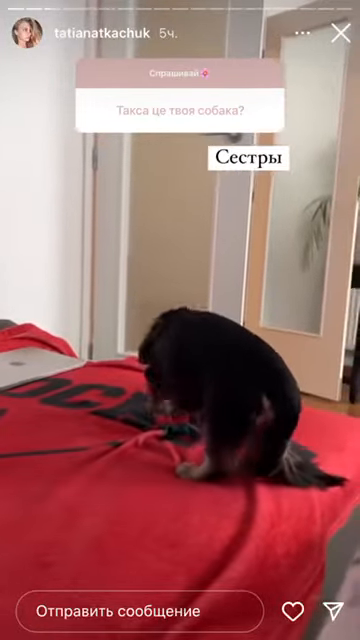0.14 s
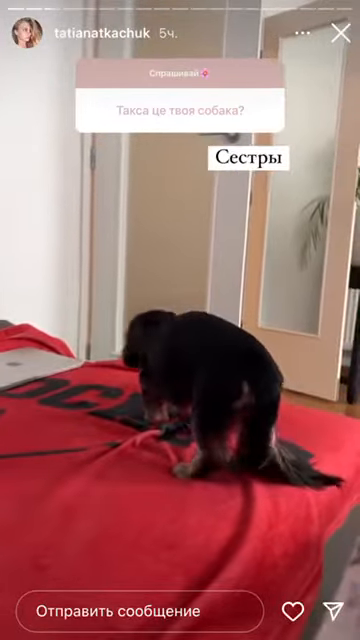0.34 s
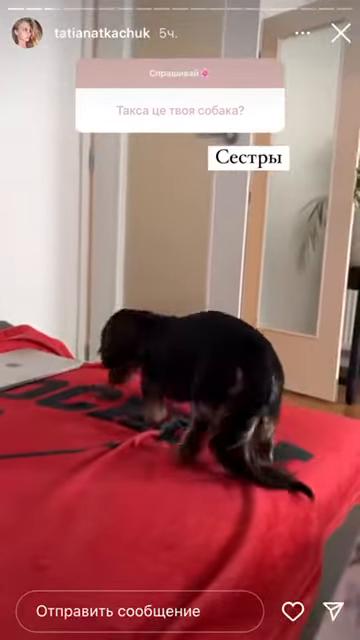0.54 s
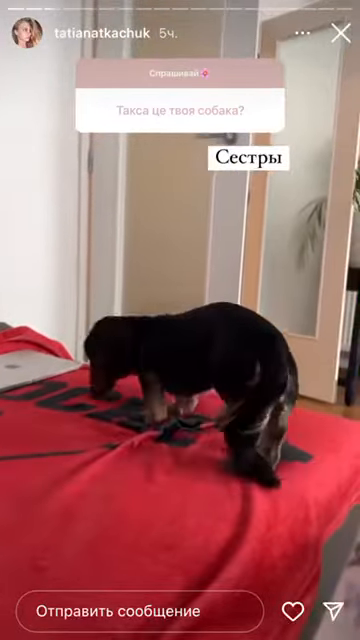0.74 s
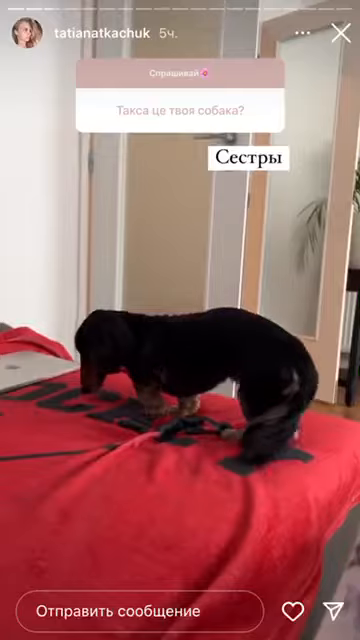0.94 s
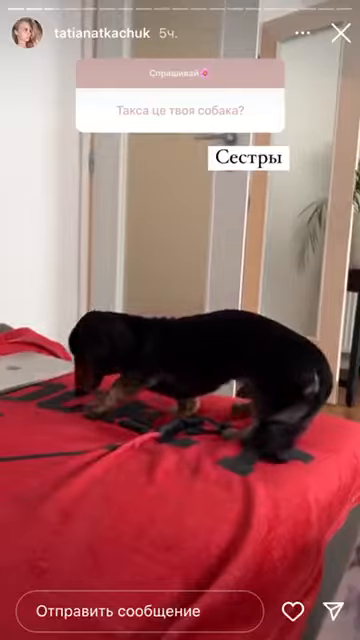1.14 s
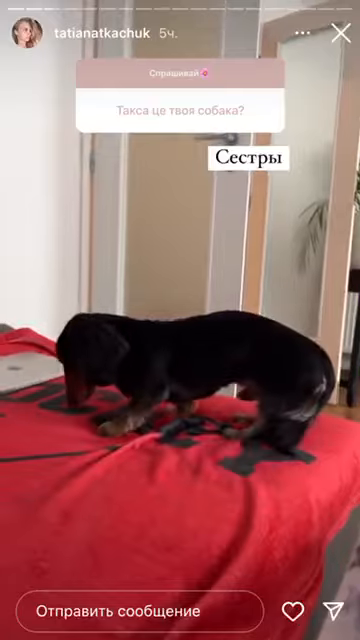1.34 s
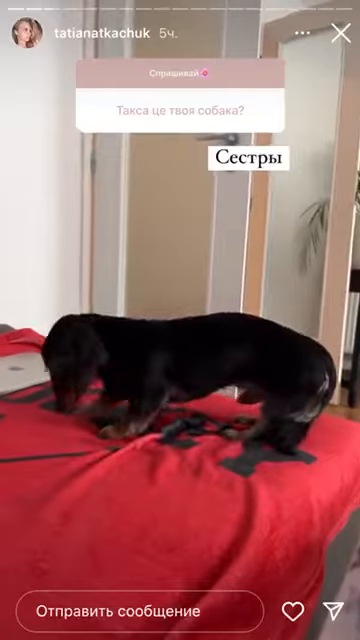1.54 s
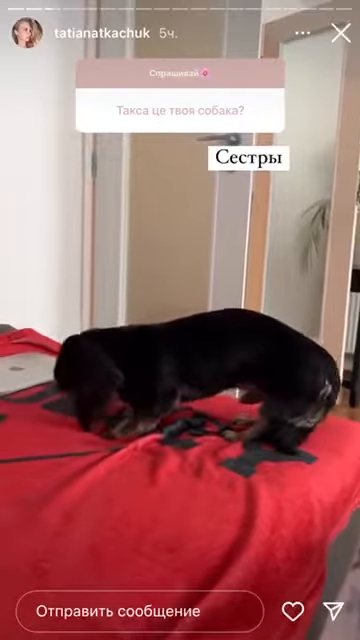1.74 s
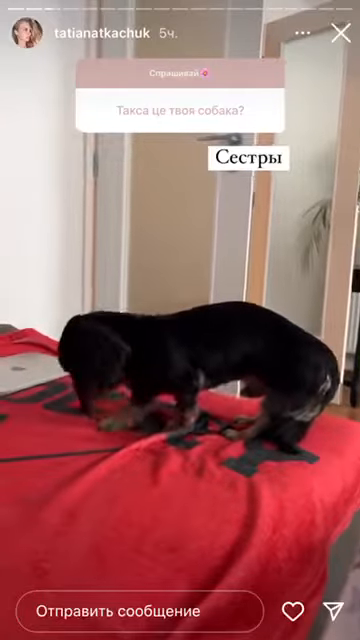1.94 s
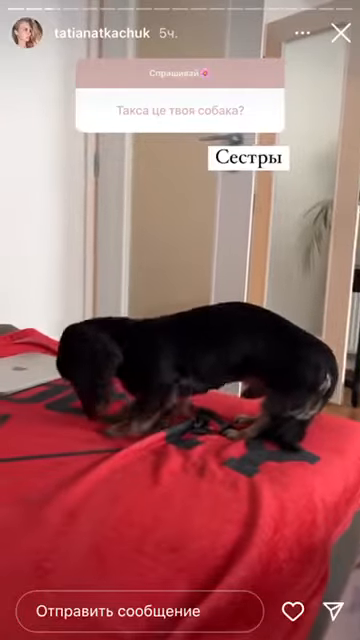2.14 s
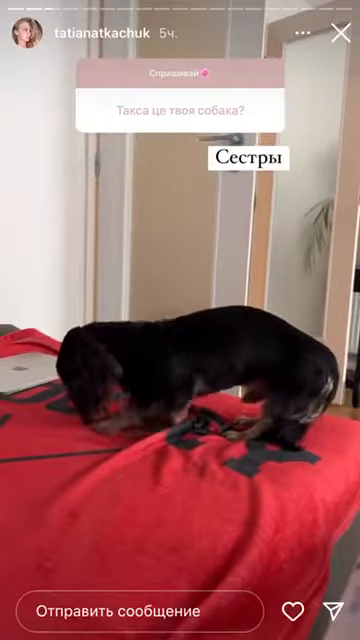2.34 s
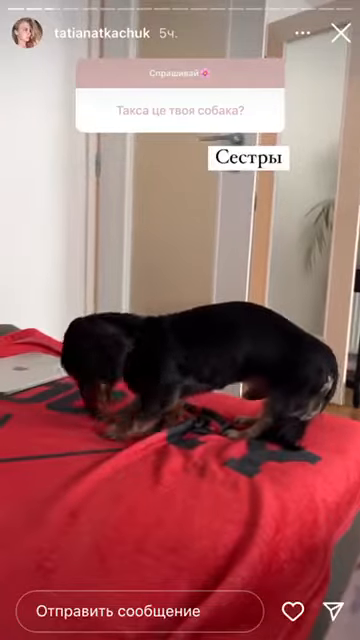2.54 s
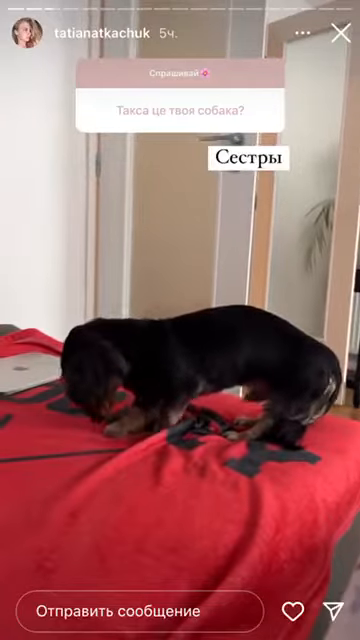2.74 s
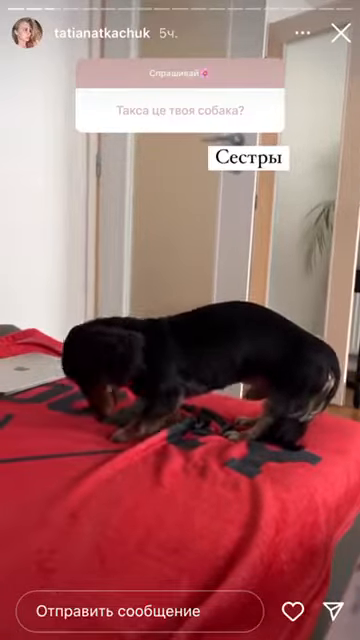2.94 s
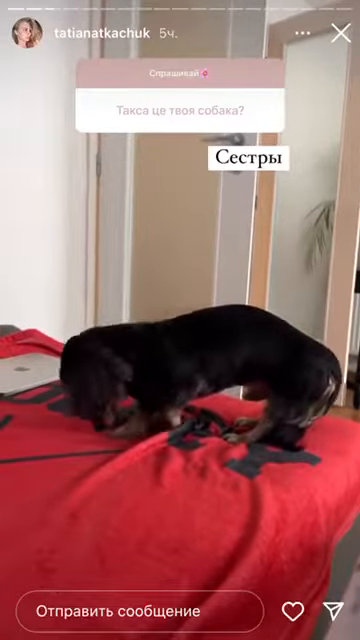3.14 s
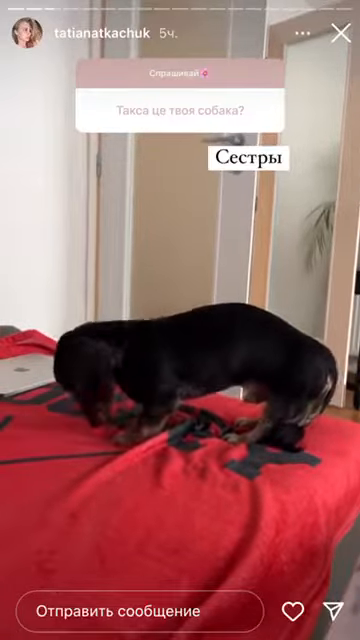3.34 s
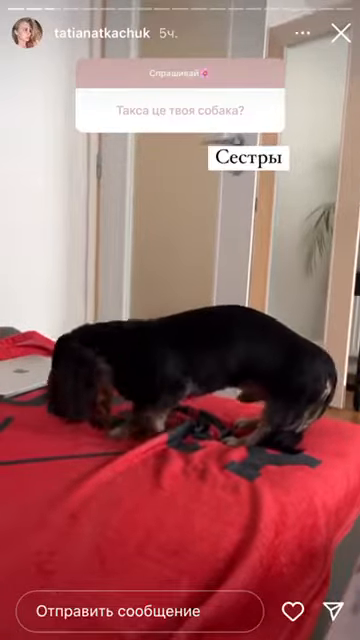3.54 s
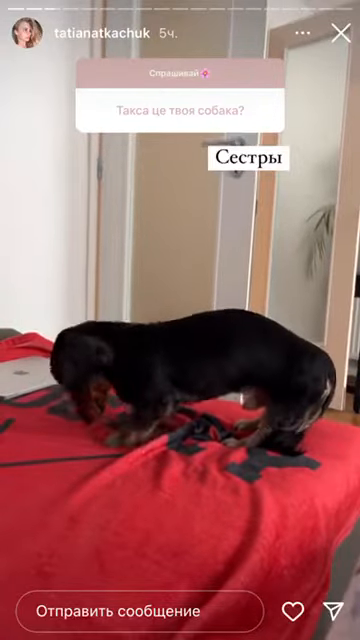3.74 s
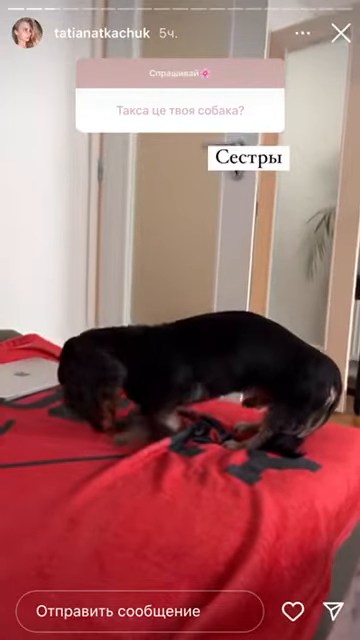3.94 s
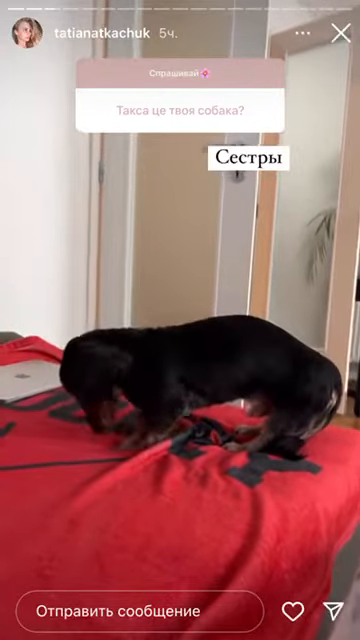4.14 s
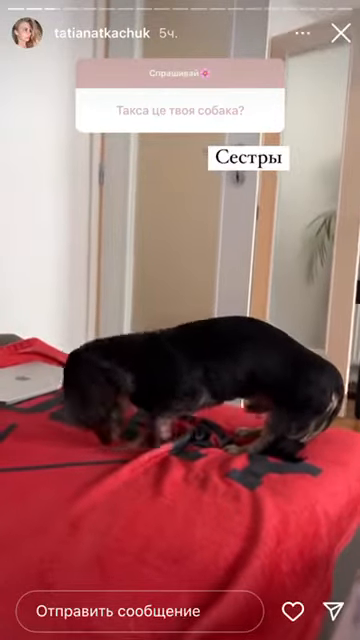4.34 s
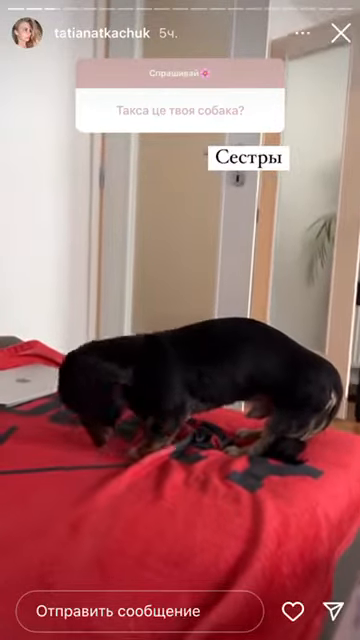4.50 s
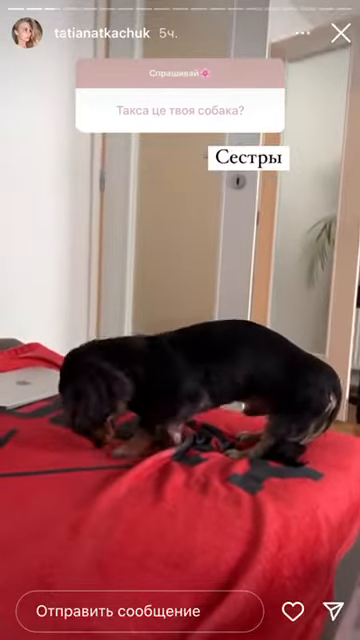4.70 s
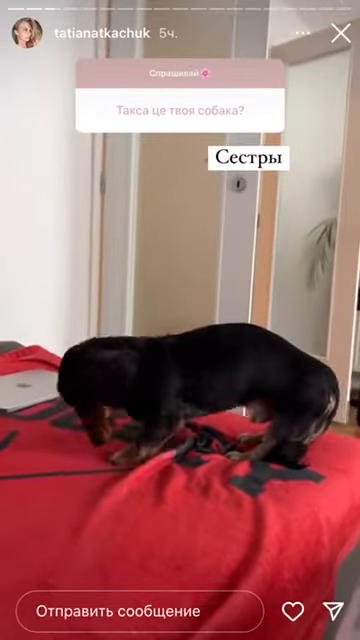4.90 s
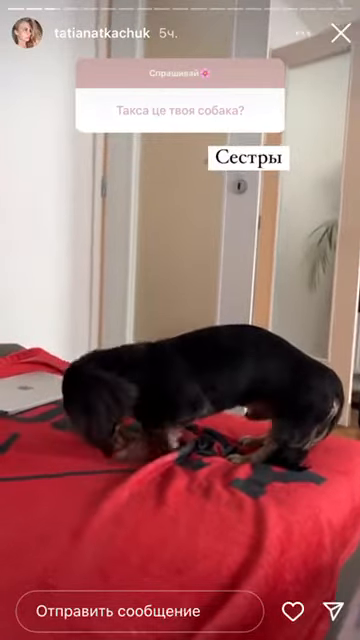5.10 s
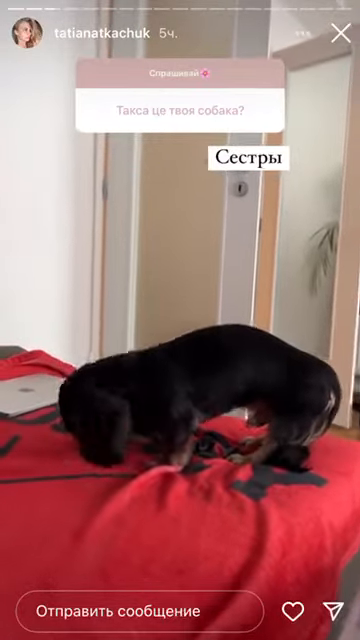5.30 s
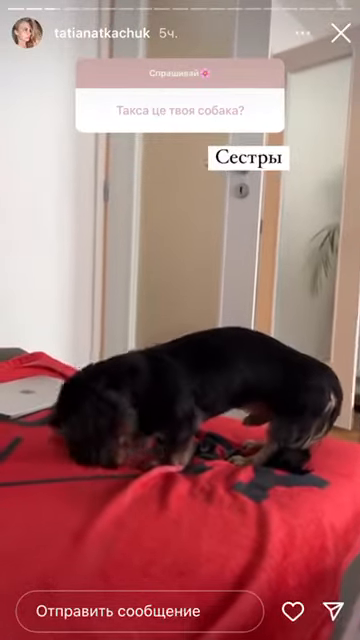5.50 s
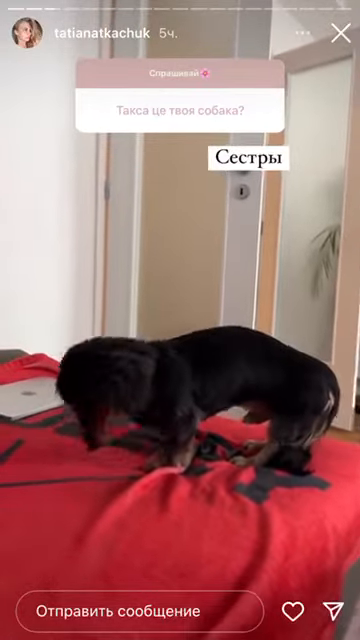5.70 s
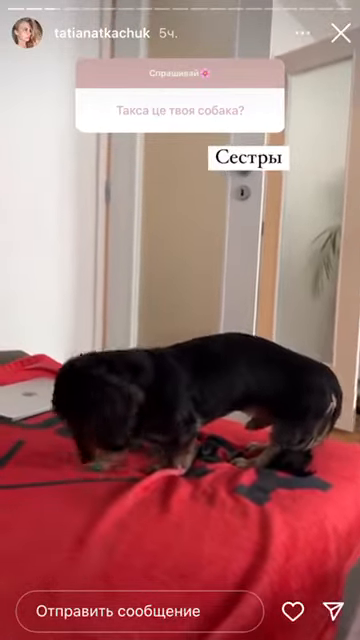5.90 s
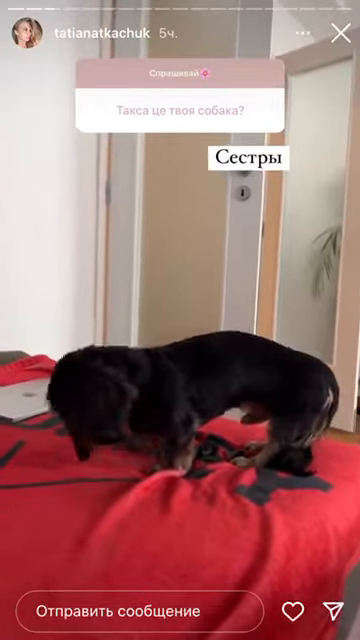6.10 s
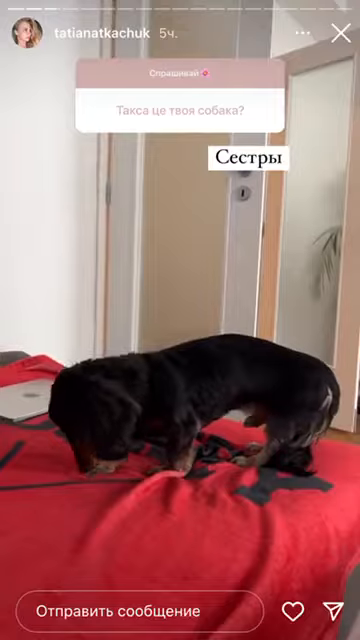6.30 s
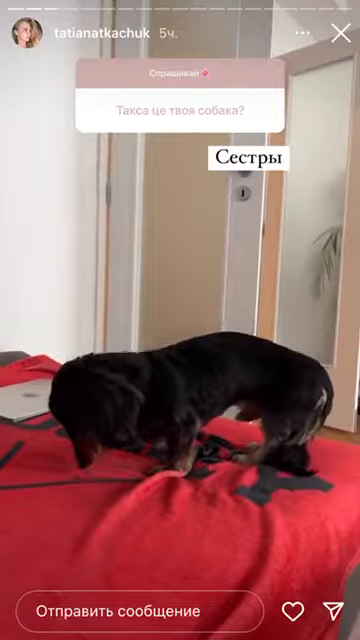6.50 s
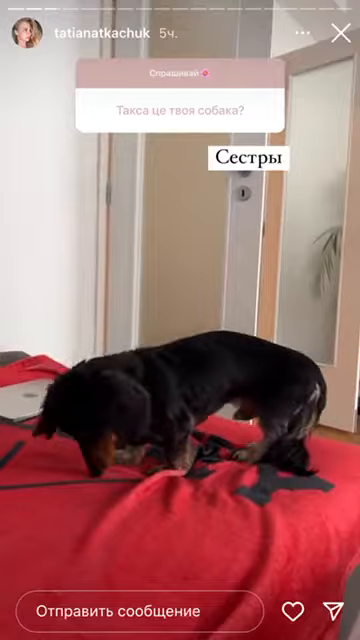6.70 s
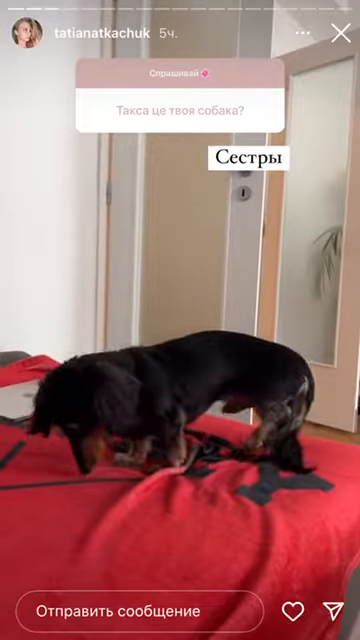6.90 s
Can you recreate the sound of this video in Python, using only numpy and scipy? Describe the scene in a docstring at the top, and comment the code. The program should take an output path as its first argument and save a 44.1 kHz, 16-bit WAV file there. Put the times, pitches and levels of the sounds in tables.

```python
"""A small bedroom, the microphone close to a small dog on a bed with a fleece blanket.
Over faint room tone the dog shuffles round, with soft steps, one hollow pop and a low hum that comes and goes.
From 1.5 s it rakes with its two front paws in turn: claws hiss over the nap, catch and slip in the weave
as it pulls taut, and each tug thuds into the mattress. After 5 s come three single strokes,
then a few more steps as it settles."""
import sys
import numpy as np
from scipy import signal
from scipy.fft import rfft, irfft, next_fast_len
from scipy.io import wavfile
from scipy.ndimage import uniform_filter1d, map_coordinates

SR = 44100
rng = np.random.default_rng(int(sys.argv[2]) if len(sys.argv) > 2 else 0)


def persist_wave(psi):
    """Save psi, clipped to +-1, as 16-bit WAV."""
    counts = np.round(np.clip(psi, -1, 1) * 32767).astype(np.int16)
    wavfile.write(sys.argv[1], SR, np.atleast_2d(counts).T)


N = 310989
TIME_S = np.arange(N) / SR


def from_db(db):
    """Decibels to gain."""
    return 10 ** (np.asarray(db) / 20)


def rms_one(x):
    """Scale to rms 1."""
    return x / np.sqrt(np.mean(x ** 2) + 1e-20)


def colour(x, spectrum):
    """Minimum-phase filter through (freq_hz, gain_db) points, falling steeply beyond their ends."""
    size = next_fast_len(N + SR // 2, real=True)
    size += size % 2
    octave = np.log2(np.maximum(np.fft.rfftfreq(size, 1 / SR), 1))
    hz, db = np.transpose(spectrum)
    beyond = np.abs(octave - np.clip(octave, np.log2(hz[0]), np.log2(hz[-1])))
    gain_db = np.interp(octave, np.log2(hz), db) - 24 * np.minimum(beyond, 2)
    cepstrum = irfft(np.log(from_db(gain_db)))
    cepstrum[1:size // 2] *= 2
    cepstrum[size // 2 + 1:] = 0
    return irfft(rfft(x, size) * np.exp(rfft(cepstrum)))[:N]


def even(x, span_s):
    """Hold the slow level at rms 1 and keep the fast grain."""
    size = max(int(span_s * SR), 8)
    power = uniform_filter1d(uniform_filter1d(x ** 2, size), size)
    return x / np.sqrt(np.abs(power) + 1e-12)


def drift(per_s):
    """A smooth random curve through per_s values a second, with a spread near 1."""
    knots, at = rng.standard_normal(8000), np.arange(0, N + 16, 16)
    curve = map_coordinates(knots, [at * per_s / SR], order=3, mode="wrap")
    return np.interp(np.arange(N), at, curve)


def swell(t, start, length):
    """A smooth rise and fall of height 1."""
    return np.sin(np.pi * np.clip((t - start) / length, 0, 1))


def swell_level(middles, lengths, levels_db):
    """The joint level of several swells, added in power."""
    t = TIME_S[::32]
    power = sum((from_db(db) * swell(t, middle - length / 2, length)) ** 2
                for middle, length, db in np.broadcast(middles, lengths, levels_db))
    return np.interp(TIME_S, t, np.sqrt(power))


def ring(hits, hz, t60_s):
    """Each hit (start_s, level_db) sets a decaying sine ringing."""
    clicks = np.zeros(N)
    for start, db in hits:
        clicks[round(start * SR)] = from_db(db)
    r, w = from_db(-60 / (t60_s * SR)), 2 * np.pi * hz / SR
    return signal.lfilter([0, np.sin(w)], [1, -2 * r * np.cos(w), r * r], clicks + 1e-18)


def slips(per_s, spread_db):
    """Random catches and releases of threads, of uneven size and either sign."""
    size = from_db(spread_db * np.minimum(rng.exponential(1, N), 4))
    return (rng.random(N) < per_s / SR) * size * rng.choice([-1, 1], N)


def shifting_folds(x, depth_db, per_s):
    """The folds change shape, so each third of an octave swells and fades on its own."""
    spectrum, hz = rfft(x, 2 ** 19), np.fft.rfftfreq(2 ** 19, 1 / SR)
    band = np.clip(3 * np.log2(np.maximum(hz, 1) / 250), 0, 17)
    thirds = (irfft(spectrum * np.maximum(1 - np.abs(band - k), 0))[:N] for k in range(18))
    return sum(third * from_db(depth_db * drift(per_s)) for third in thirds)


# The quiet bedroom's spectrum: freq_hz, gain_db
ROOM_TONE_SPECTRUM = [(90, -7.5), (150, 2.5), (217, -1.5), (300, -5.5), (420, -21), (520, -25), (650, -24),
                      (1100, -26.5), (1700, -29.5), (2300, -23.5), (2700, -24), (3600, -30), (6500, -30.5),
                      (15500, -39)]
def room_tone(level_db=-37.57):
    """Faint, steady, mostly low noise behind everything."""
    return from_db(level_db) * rms_one(colour(rng.standard_normal(N), ROOM_TONE_SPECTRUM))


# Resonances of the bed and its corner of the room: pitch_hz, width_hz, gain_db
BED_MODES = [(163, 12, 4.5), (336.4, 4.9, -5.5), (406, 84, 3.5), (546, 87, 1), (608, 32, 5),
             (734, 3.5, 6.5), (790, 84, 4), (1080, 30, 6)]
def bed(x):
    """The bed puts a few fixed peaks and one dip into whatever shakes it."""
    for hz, width_hz, db in BED_MODES:
        x = x + (from_db(db) - 1) * signal.lfilter(*signal.iirpeak(hz, hz / width_hz, fs=SR), x)
    return x


# The dog shifts its feet before and after digging: middle_s, length_s, rustle_db, pressure_db, heave_db
SHUFFLES = [(0.044, 0.24, -46, -30.5, -47), (0.148, 0.081, -41.5, -30, -37), (0.267, 0.45, -39, -47, -41),
            (0.467, 0.2, -44.0, -36.0, -32), (0.602, 0.058, -37, -25.5, -30), (0.676, 0.23, -34, -35, -22),
            (1.015, 0.11, -36.5, -27, -27), (1.111, 0.2, -36, -33.5, -47), (1.265, 0.16, -42, -48, -25),
            (6.366, 0.1, -38, -62.5, -28.5), (6.48, 0.31, -45, -33, -28), (6.618, 0.14, -47, -37, -44),
            (6.735, 0.096, -55, -33, -39.0), (6.844, 0.26, -45, -41, -23.5), (7.04, 0.11, -52, -38, -35.0)]
# Spectra of rustling fleece and of the mattress padding: freq_hz, gain_db
RUSTLE_SPECTRUM = [(250, -25.5), (420, 3), (540, 3.5), (680, 2.5), (1100, -2.5), (2100, -8.5),
                   (2700, -15.5), (3700, -11.5), (5000, -21), (8000, -17.5), (14000, -33)]
PADDING_SPECTRUM = [(90, -11.5), (140, -4.5), (190, -0.5), (240, -2.5), (300, -8), (400, -17), (600, -44.5)]
def shuffling(rest_rustle_db=-42, rest_pressure_db=-45):
    """Fur and paws brush the blanket and press into the padding; the dog is never quite still."""
    middle, length, rustle_db, pressure_db, _ = np.transpose(SHUFFLES)
    rustle = np.hypot(swell_level(middle, length, rustle_db), from_db(rest_rustle_db))
    pressure = np.hypot(swell_level(middle, length, pressure_db), from_db(rest_pressure_db))
    cloth = colour(slips(2500, spread_db=2.0), RUSTLE_SPECTRUM)
    cloth = even(shifting_folds(cloth, depth_db=3.0, per_s=16), span_s=0.097)
    padding = even(bed(colour(rng.standard_normal(N), PADDING_SPECTRUM)), span_s=0.026)
    return from_db(-3.5 + drift(28)) * rustle * cloth + from_db(-4.5) * pressure * padding


# The deep rumble of the mattress, heard from close by: freq_hz, gain_db
HEAVE_SPECTRUM = [(15, -43), (25, -3), (36, -1), (47, -3.5), (63, 3), (85, -4.5), (112, -3.5), (140, -14),
                  (250, -35)]
def mattress_heave(rest_db=-30.5):
    """The mattress heaves under every shuffle and stroke and settles slowly."""
    middle, length, _, _, heave_db = np.transpose(SHUFFLES)
    shuffles = swell_level(middle, length, heave_db)
    strokes = stroke_level([row[-1] for row in STROKES], lag_s=0.024, release_s=0.22, ease_db=0)
    level = np.sqrt(strokes ** 2 + shuffles ** 2 + from_db(rest_db) ** 2)
    return from_db(1.07) * level * even(colour(rng.standard_normal(N), HEAVE_SPECTRUM), span_s=0.043)


# Soft steps on the bed: start_s, level_db
STEPS = [(0.137, -25), (1.384, -21.5), (6.5, -26), (6.606, -22), (6.715, -15.5), (6.881, -20.5)]
def paw_steps():
    """Each step rings two low, quickly damped tones."""
    return from_db(-5.5) * (ring(STEPS, hz=190, t60_s=0.094) + ring(STEPS, hz=230, t60_s=0.072))


# The clicks within one pop: start_s, level_db
POP_CLICKS = [(0.3709, -16), (0.3724, -13.5), (0.3743, -8), (0.3776, -40), (0.3842, -18.5)]
# The resonances they excite: pitch_hz, level_db, t60_s
POP_MODES = [(636, -4, 0.033), (840, -2, 0.019), (970, -12, 0.034), (1095, -38, 0.036), (1540, -38, .02),
             (1710, -26, 0.057), (2180, -30, 0.059)]
def hollow_pop(lowpass_hz=2500):
    """A tight cluster of clicks rings briefly and is heard as one hollow pop."""
    pop = sum(from_db(db) * ring(POP_CLICKS, hz, t60_s) for hz, db, t60_s in POP_MODES)
    return signal.sosfilt(signal.butter(4, lowpass_hz, fs=SR, output="sos"), pop)


# A faint low hum that comes and goes: start_s, length_s, pitch_hz, fundamental_db, octave_db
HUMS = [(0.61, 0.16, 205.8, -33, -32.5), (5.457, 0.22, 205.3, -31, -36.5), (6.24, 0.31, 215.3, -27.5, -47),
        (6.967, 0.19, 205, -32, -36)]
def hum(waver=0.013):
    """A soft tone and its octave swell and fade, slightly unsteady in pitch."""
    phase_per_hz = 2 * np.pi * np.cumsum(1 + waver * drift(25)) / SR
    out = np.zeros(N)
    for start, length, hz, db, octave_db in HUMS:
        phase = hz * phase_per_hz
        tone = from_db(db) * np.sin(phase) + from_db(octave_db) * np.sin(2 * phase)
        out += swell(TIME_S, start, length) * tone
    return out


# A paw jerks the blanket or lands with the dog's weight on it: middle_s, thud_db, bounce_db
THUMPS = [(0.668, -41, -21), (1.55, -7, -30), (1.64, -21, -18), (1.698, -14, -26), (1.869, -7.5, -24.5),
          (1.974, -19.5, -7), (2.142, -5, -15), (2.355, -17, -9.5), (2.52, -9, -15), (2.661, -9, -30),
          (2.74, -20, -17), (3.261, -14.5, -14), (3.421, -25, -11), (4.03, -6, -14), (4.418, -17.5, -6.5),
          (4.588, -9.5, -16), (4.743, -19, -11.5), (4.815, -14.5, -14.5), (5.019, -25, -13),
          (5.39, -15, -25)]
THUMP_S = 0.042
def mattress_bounce(pitch_hz=66.5):
    """The mattress gives once under each thump."""
    out = np.zeros(N)
    for middle, _, db in THUMPS:
        level = from_db(db + 3.0) * swell(TIME_S, middle - THUMP_S / 2, THUMP_S) ** 2
        out += level * np.cos(2 * np.pi * pitch_hz * (TIME_S - middle))
    return out


def mattress_thuds(catches, tug):
    """Thumps and tugs carry the claws' catches into the padding as dull thuds."""
    middle, thud_db, _ = np.transpose(THUMPS)
    level = np.hypot(tug, swell_level(middle, THUMP_S, thud_db))
    return from_db(0.05) * level * even(bed(colour(catches, PADDING_SPECTRUM)), span_s=0.063)


# A paw lands and brushes dryly forward over the cloth: middle_s, length_s, level_db
BRUSHES = [(1.481, 0.1, -36), (2.056, 0.066, -31), (2.832, 0.096, -29), (3.232, 0.12, -28.5),
           (3.58, 0.089, -31.5), (3.985, 0.14, -26), (4.364, .08, -25.5), (4.49, 0.14, -31),
           (4.726, 0.07, -23), (5.32, 0.1, -28), (5.71, 0.071, -38), (6.052, 0.11, -33.5)]
# Its spectrum: freq_hz, gain_db
BRUSH_SPECTRUM = [(800, -35), (1100, 1), (1450, 12.5), (1900, 11.5), (2200, 11.5), (2400, -1), (2750, -27),
                  (5000, -32)]
def paw_brushes():
    """Light contact: dense small slips with no weight behind them."""
    level = sum(from_db(db) * swell(TIME_S, middle - length / 2, length)
                for middle, length, db in BRUSHES)
    return level * even(colour(slips(4000, spread_db=1.0), BRUSH_SPECTRUM), span_s=0.061)


def treble_ripple(x, span_s, gain, count=16, changes_per_s=4):
    """A fine, shifting comb ripple colours the hiss, changing a few times a second."""
    out, step = np.zeros(N + SR), SR // changes_per_s
    for middle in range(0, N + step, step):
        taps = np.zeros(int((span_s + .002) * SR) + 2)
        taps[-1 - (rng.random(count) * span_s * SR).astype(int)] = gain * rng.choice([-1, 1], count)
        taps[0] = 1
        part = slice(max(middle - step, 0), middle + step)
        crossfade = swell(TIME_S[part], (middle - step) / SR, 2 * step / SR)
        combed = signal.fftconvolve(x[part] * crossfade, taps)
        out[part.start:part.start + len(combed)] += combed
    return out[:N]


# The nap at close range, its hiss and its topmost sizzle: freq_hz, gain_db
HISS_SPECTRUM = [(1500, 8), (2600, -0.5), (3000, -0.5), (3600, -2.5), (4400, 0), (5100, -3), (5700, -2),
                 (6500, -2.5), (7300, -11), (8500, -5), (11000, -18), (15500, -45)]
SIZZLE_SPECTRUM = [(6500, -8), (7800, 10), (8900, 16), (9800, 8), (10150, 3), (10700, -5), (11000, -9),
                   (13000, -6), (15500, -24)]
def nap_hiss(catches, level):
    """The fine nap adds far more and far smaller slips; a faster stroke sizzles more at the top."""
    fibres = rms_one(slips(6000, spread_db=2.0)) + from_db(-8.5) * rms_one(catches)
    fibres = treble_ripple(fibres, span_s=.008, gain=0.12)
    nap = even(shifting_folds(colour(fibres, HISS_SPECTRUM), depth_db=2.15, per_s=14), span_s=0.011)
    speed = level / level.max()
    sizzle = from_db(-7.5) * speed ** 1.15 * even(colour(fibres, SIZZLE_SPECTRUM), span_s=0.03)
    flicker = from_db(0.46 * drift(160))
    snapping_fibres = from_db(-12) * rms_one(colour(slips(140, spread_db=2.5), HISS_SPECTRUM))
    return from_db(3.0) * level * flicker * (nap + sizzle + snapping_fibres)


# The taut weave under a claw: freq_hz, gain_db
RASP_SPECTRUM = [(250, -28), (400, 2), (600, -2.5), (900, -3.5), (1150, -6), (1400, -10), (1900, -12.5),
                 (2300, -21.5), (2800, -54.5), (4500, -34.5)]
def weave_rasp(catches, body_level, edge_level, edge_hz=590):
    """The catches rasp in the cloth, with a low body and a bright edge above edge_hz."""
    cloth = bed(colour(catches, RASP_SPECTRUM))
    cloth = even(shifting_folds(cloth, depth_db=2.26, per_s=25), span_s=0.087)
    body = signal.sosfiltfilt(signal.butter(2, edge_hz, fs=SR, output="sos"), cloth)
    return from_db(-2) * (body_level * body + edge_level * (cloth - body))


# Front-paw strokes close to the microphone; the grip is the hardest pull, as a share of the length:
# start_s, length_s, attack_s, grip_share, hiss_db, rasp_db, tug_db, heave_db
STROKES = [ (1.495, 0.095, 0.08, 0.48, -33.5, -12, -13, -20),
           (1.602, .062, .06, 0.2, -31.5, -14.5, -14, -16), (1.685, 0.03, .04, 0.4, -36, -20, -16, -19),
           (1.85, 0.1, 0.046, 0.77, -29, -8, -9, -17), (2.075, 0.073, 0.075, 0.73, -30.5, -11, -11, -17.5),
           (2.202, .11, 0.057, 0.47, -29.5, -10.5, -8.5, -20),
           (2.428, 0.077, 0.074, 0.84, -30.5, -11.5, -14, -15.5),
           (2.555, 0.1, .038, 0.81, -30, -9, -13, -18.5), (2.818, 0.067, 0.047, 1, -31, -12, -14, -18),
           (2.942, .11, 0.053, 0.8, -31, -12.5, -11.5, -21.5),
           (3.203, 0.075, 0.026, 0.95, -32, -16, -17.5, -15.5),
           (3.354, .1, 0.04, 0.95, -32, -12.5, -11, -18.5),
           (3.578, 0.1, 0.039, 0.99, -29.5, -12.5, -13.5, -15),
           (3.718, .13, 0.07, 0.88, -31.5, -11.5, -10.5, -20),
           (3.963, 0.067, .055, .6, -28.5, -10.5, -12, -17),
           (4.12, 0.085, 0.11, 0.9, -30.5, -10.5, -9.5, -16),
           (4.345, .063, 0.037, 1, -31, -14.5, -15, -22.5),
           (4.485, 0.1, 0.081, .7, -31.5, -12.5, -13.5, -16),
           (4.708, 0.084, 0.031, 0.9, -30.5, -11.5, -13.5, -16.5),
           (4.866, 0.097, 0.069, 0.96, -33.5, -13.5, -17, -21.5),
           (5.305, .1, 0.057, 0.98, -35, -13, -11.5, -18), (5.748, 0.067, 0.11, 0.76, -33, -12, -12.5, -20),
           (6.116, 0.065, .1, .75, -33.5, -13, -14.5, -21), ]
def stroke_level(levels_db, lag_s, release_s, ease_db, attack_share=0.81):
    """Each stroke sets in, pulls harder up to its grip, eases off by ease_db and is released."""
    t, power = TIME_S[::32], 0
    for (start, length, attack_s, grip, *_), db in zip(STROKES, levels_db):
        age = t - start - lag_s
        attack = np.maximum(-age, 0) / (attack_s * attack_share)
        release = np.maximum(age - length, 0) / release_s
        fade_db = 20 * (attack + release) ** 1.16  # more decisive than a plain fade
        slack = np.interp(age / length, [0, np.clip(grip, .01, .99), 1], [1, 0, 1])
        power = power + from_db(db - fade_db - ease_db * slack) ** 2
    return np.interp(TIME_S, t, np.sqrt(power + 1e-18))


def digging():
    """Claws catch and slip, faster in a harder stroke; the same catches rasp, thud and hiss."""
    *_, hiss_db, rasp_db, tug_db, _ = np.transpose(STROKES)
    # the nap hisses at first touch; the weave needs pressure and sets in later
    hiss = stroke_level(hiss_db, lag_s=0, release_s=0.071, ease_db=1, attack_share=0.91)
    body = stroke_level(rasp_db, lag_s=0.002, release_s=0.095, ease_db=5.5)
    edge = stroke_level(rasp_db, lag_s=-0.0018, release_s=0.072, ease_db=5.1)
    tug = stroke_level(tug_db, lag_s=0.009, release_s=0.068, ease_db=3.27)
    catches = slips(500 + 1500 * np.sqrt(body / body.max()), spread_db=1.0)
    return weave_rasp(catches, body, edge) + mattress_thuds(catches, tug) + nap_hiss(catches, hiss)


# A claw runs over the ribs of the weave: start_s, length_s, first_hz, last_hz, level_db
ZIPS = [(1.491, 0.03, 616, 1270, -34.5), (1.869, 0.029, 606, 780, -10), (1.887, 0.049, 964, 1660, -17),
        (2.091, 0.056, 687, 1335, -10), (2.264, 0.055, 1196, 1040, -17.5), (2.475, 0.046, 790, 692, -8.5),
        (2.61, 0.056, 1443, 1054, -17.5), (2.989, 0.043, 1489, 857, -13.5),
        (3.338, 0.041, 1516, 633, -18.5), (3.414, 0.033, 1090, 1590, -19), (3.631, 0.042, 827, 1680, -14),
        (3.799, 0.047, 448, 387, -14.5), (3.978, 0.06, 669, 1195, -10), (4.156, 0.061, 706, 582, -11.5),
        (4.374, 0.045, 1165, 816, -14.5), (4.507, 0.07, 1248, 718, -15), (4.864, 0.12, 439, 418, -17.5),
        (5.299, 0.089, 628.4, 641, -11), (5.347, 0.05, 1724, 988, -16.5), (5.72, 0.091, 390, 473, -11.5),
        (5.776, 0.043, 638, 1890, -12.5), (6.098, 0.069, 370, 772, -13.5), (6.139, 0.056, 646, 1140, -17),
        (6.173, 0.11, 690, 640, -29)]
def claw_zips(waver=.11, rough_db=2.5, overtone=0.016):
    """Rib after rib is plucked: the pitch follows the claw's speed and wavers as the ribs are uneven."""
    out = np.zeros(N)
    unsteady = 1 + waver * drift(700)
    grip = rms_one(from_db(rough_db * drift(450)))
    for start, length, first_hz, last_hz, db in ZIPS:
        at = np.arange(int(start * SR), int((start + length) * SR))
        phase = 2 * np.pi * np.cumsum(np.geomspace(first_hz, last_hz, len(at)) * unsteady[at]) / SR
        tone = np.sin(phase) + overtone * np.sin(2 * phase)
        out[at] += from_db(db) * swell(at / SR, start, length) * grip[at] * tone
    return out


# A claw snags a thread: middle_s, length_s, level_db, centre_hz
SNAGS = [(3.208, 0.0099, -33, 7100), (3.782, 0.0071, -27.5, 9700), (3.806, 0.048, -36.5, 9500)]
def snagged_threads(width_hz=1700):
    """A quick run of tiny slips along one taut thread makes a short, thin rasp."""
    out, threads = np.zeros(N), slips(8000, spread_db=-1.5)
    for middle, length, db, hz in SNAGS:
        band = signal.butter(2, [hz - width_hz / 2, hz + width_hz / 2], "band", fs=SR, output="sos")
        out += swell_level([middle], length, db) * rms_one(signal.sosfilt(band, threads))
    return out


# Echoes off the door and the nearest wall: delay_s, gain
REFLECTIONS = [(.0034, 0.041), (.0059, 0.1), (.0093, .22), (0.0136, 0.095)]
def near_walls(x):
    """First reflections reach the microphone just behind the direct sound and ripple its spectrum."""
    return x + sum(gain * np.pad(x, (int(delay * SR), 0))[:N] for delay, gain in REFLECTIONS)


# Standing waves of the bedroom: pitch_hz, t60_s, level_db
ROOM_MODES = [(174.6, 0.23, -6), (216.5, 1, -35), (356.2, 0.43, 7.5), (405, 0.21, -10.5), (448.7, 0.19, -5),
              (554, 0.26, -14), (574, 0.31, -9), (670, 0.32, -6), (970, 0.66, -31)]
def bedroom(x, t60_s=0.42, wash_db=-11.5):
    """Dense reflections, dulled by soft furnishings, and standing waves that ring on after a stroke."""
    t = np.arange(SR // 2) / SR
    tail = rng.standard_normal(len(t)) * from_db(-60 * t / t60_s) * (t > .008)
    wash = signal.fftconvolve(x, tail / np.sqrt(np.sum(tail ** 2)))[:N]
    out = from_db(wash_db) * signal.lfilter(*signal.butter(1, 3500, fs=SR), wash)
    for hz, mode_t60_s, db in ROOM_MODES:
        q = np.pi * hz * mode_t60_s / np.log(1000)
        out += from_db(db) * signal.lfilter(*signal.iirpeak(hz, q, fs=SR), x)
    return out


def scene():
    """In mono from beside the bed: the dog close up, the bedroom's answer and a faint background."""
    dog = near_walls(digging() + paw_brushes() + snagged_threads() + shuffling()) + claw_zips()
    hits = paw_steps() + hollow_pop()
    room = room_tone() + bedroom(dog + from_db(-6) * hits)
    return (dog + hits + room + mattress_heave() + mattress_bounce() + hum())[None]


def record(dry, low_cut_hz=29, high_cut_hz=15900):
    """The microphone sheds deep bass and the very top; the hardest strokes overload with a dull crunch."""
    heard = signal.sosfilt(signal.butter(6, low_cut_hz, "high", fs=SR, output="sos"), dry)
    overload = heard / (1 + heard ** 12) ** (1 / 12) - heard
    crunch = signal.sosfiltfilt(signal.butter(4, 7000, fs=SR, output="sos"), overload)
    return signal.sosfilt(signal.ellip(10, .1, 80, high_cut_hz, fs=SR, output="sos"), heard + crunch)


dry = scene()
out = record(dry)
persist_wave(out)
```